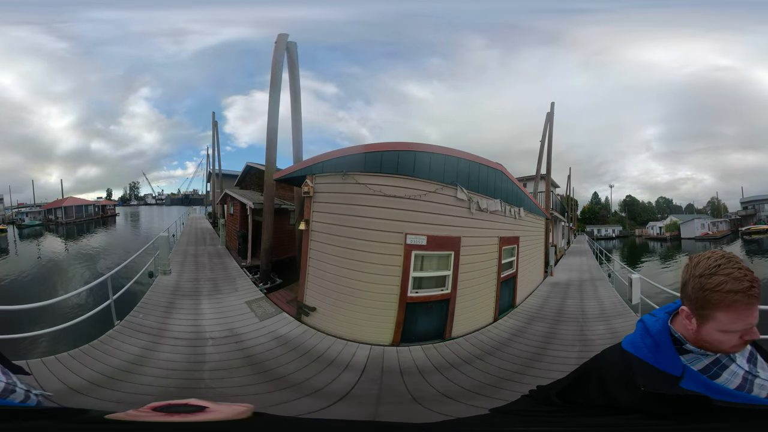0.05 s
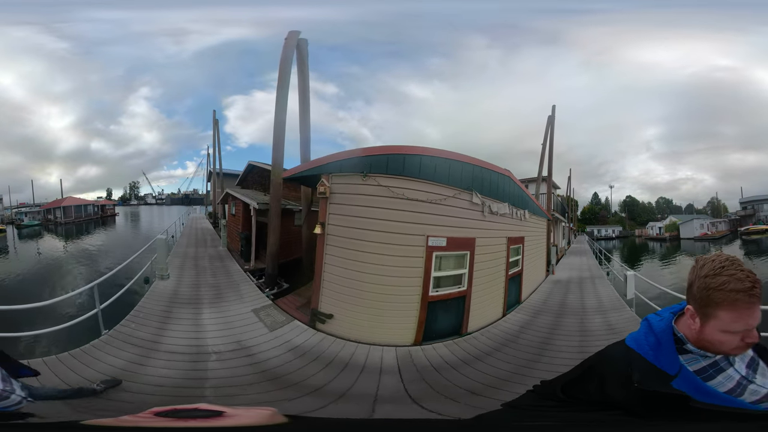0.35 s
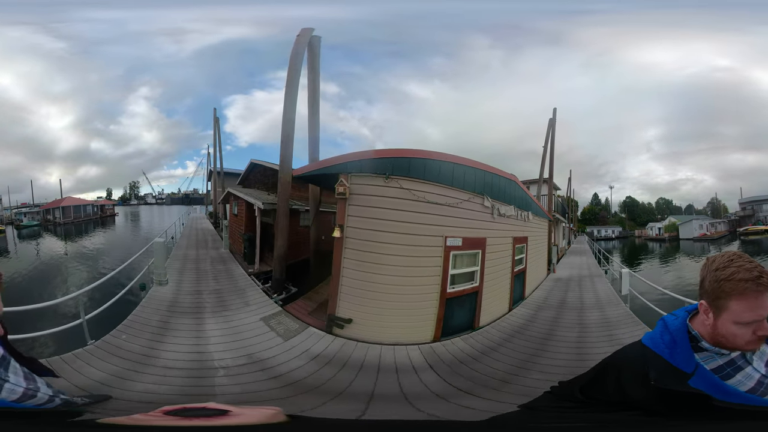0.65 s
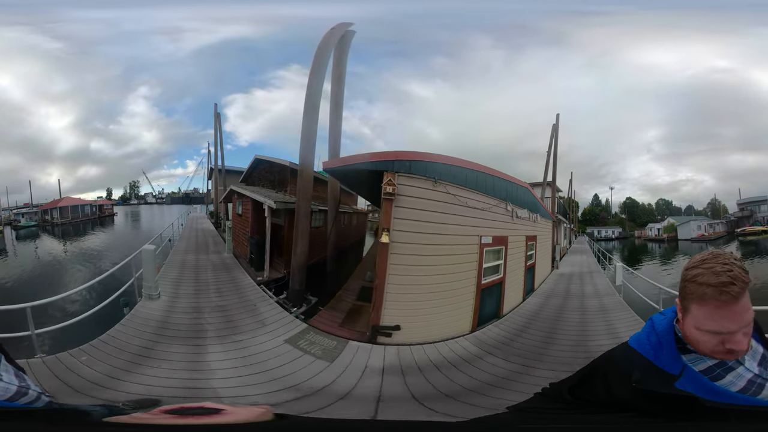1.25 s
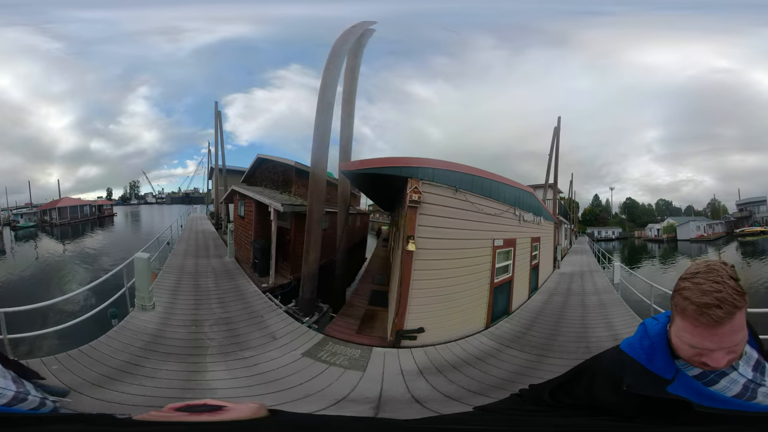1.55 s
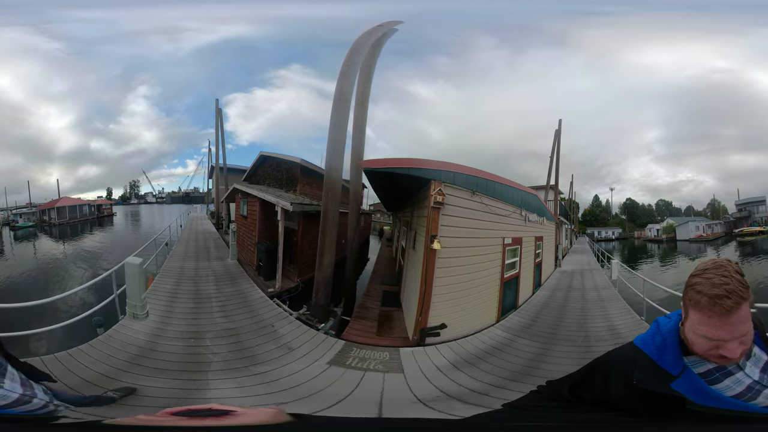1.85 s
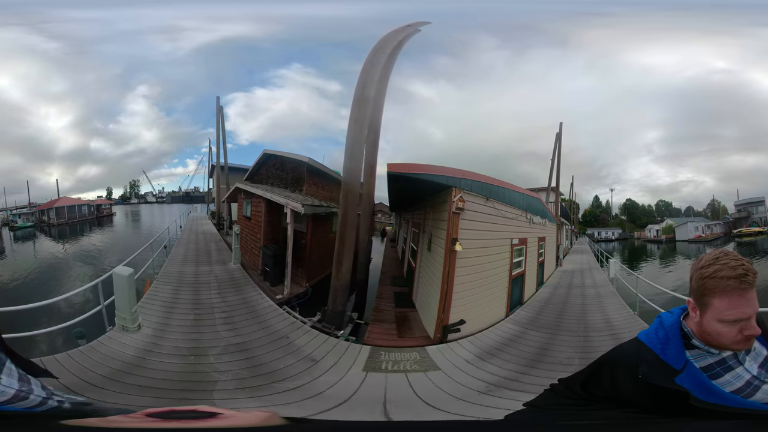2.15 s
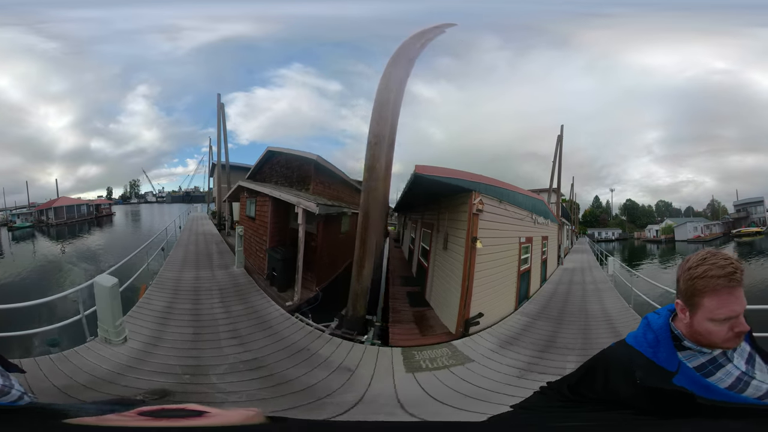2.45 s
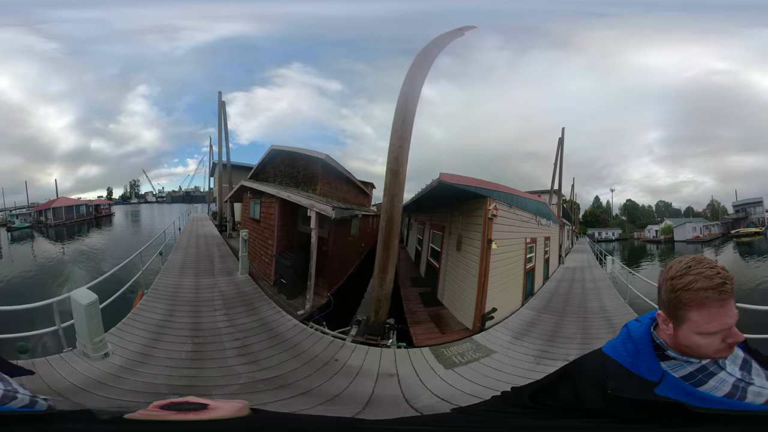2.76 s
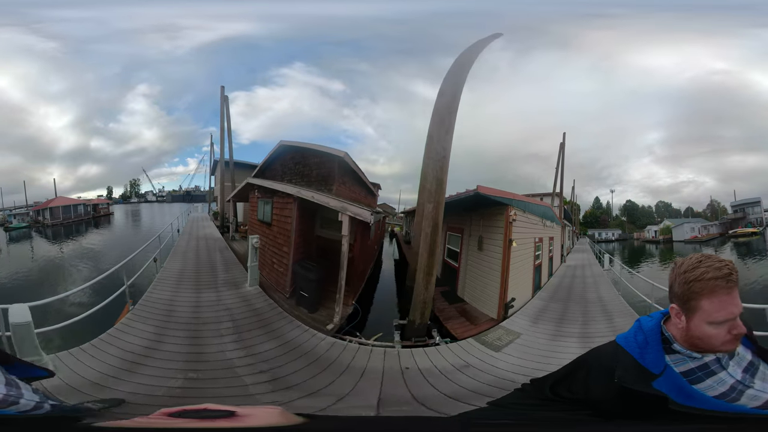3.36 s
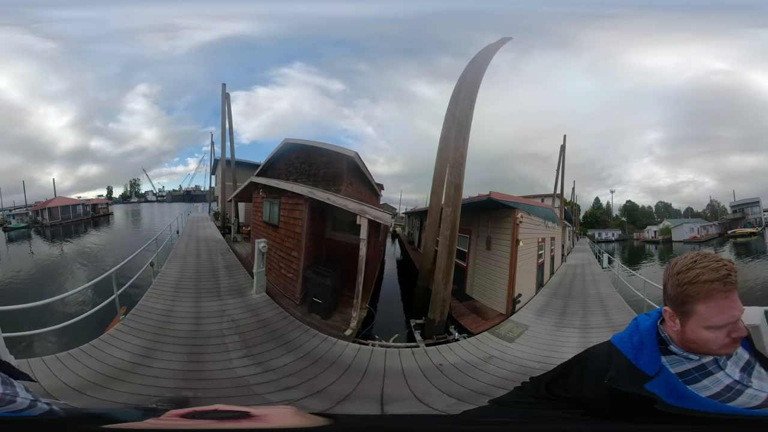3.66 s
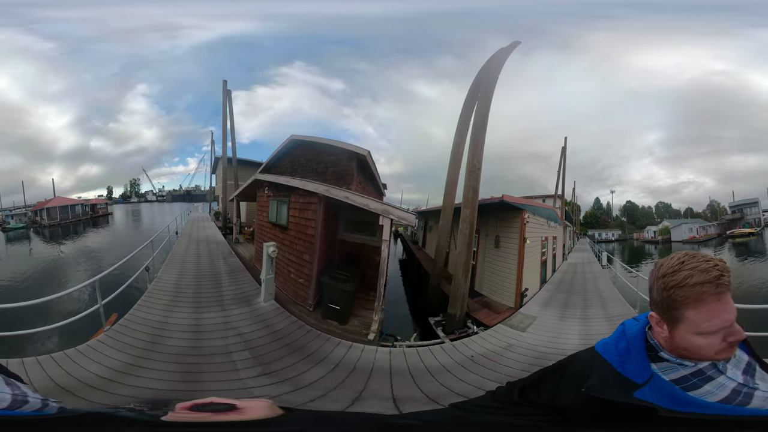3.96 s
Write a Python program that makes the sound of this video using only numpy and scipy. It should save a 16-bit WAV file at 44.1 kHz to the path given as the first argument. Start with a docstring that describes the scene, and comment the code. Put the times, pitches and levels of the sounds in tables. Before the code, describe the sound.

Distant traffic rumbles on a wooden dock between houseboats. Passing vehicles swell with low drones and tyre rasps, then a faint thin hiss appears. Light wind buffets the carried microphone, which bumps dully in the second half.

```python
"""Distant traffic rumbles, heard on a walk along a wooden dock between houseboats.
Passing vehicles swell out of the roar with low drones and tyre rasps. Faint high peeps come from
far off, and a thin, faintly whistling hiss opens up between the houses. The boards knock softly,
and the house walls echo all of this. Light wind buffets the microphone, which bumps dully as it is
carried. Very faint, tiny high clicks and crackle lie over the mix."""
import sys
import numpy as np
from scipy import signal
from scipy.fft import rfft, irfft
from scipy.io import wavfile
from scipy.ndimage import map_coordinates

SR = 44100
rng = np.random.default_rng(int(sys.argv[2]) if len(sys.argv) > 2 else 0)


def log_audio(samples):
    """Write samples as a 16-bit WAV file to the path given in sys.argv[1]."""
    # one column per channel
    frames = np.atleast_2d(samples).T
    # limit to full scale, then quantise
    limited = np.clip(frames, -1, 1)
    pcm = np.round(limited * 32767).astype(np.int16)
    wavfile.write(sys.argv[1], SR, pcm)


N = 176400
T = np.arange(N) / SR
HZ = np.fft.rfftfreq(N, 1 / SR)


def amp(db):
    """Decibels to gain."""
    return 10 ** (np.asarray(db) / 20)


def unit(x):
    """Scale to rms 1."""
    return x / np.sqrt(np.mean(x ** 2) + 1e-30)


def colour(points):
    """Gain per frequency from (freq_hz, gain_db) points."""
    freq_hz, gain_db = np.transpose(points)
    return amp(np.interp(np.log(HZ + 1), np.log(freq_hz), gain_db))


def level(points):
    """Gain per sample from (time_s, level_db) points."""
    return amp(np.interp(T, *np.transpose(points)))


def noise(spectrum):
    """Shaped noise of rms 1, rolled off below 14 Hz."""
    highpass = 1 - np.exp(-(HZ / 14) ** 4)
    phases = np.exp(2j * np.pi * rng.random(len(HZ)))
    return unit(irfft(spectrum * highpass * phases, N))


def noise_band(centre_hz, sigma_hz):
    """Gaussian band of noise, rms 1."""
    return noise(np.exp(-.5 * ((HZ - centre_hz) / sigma_hz) ** 2))


def drift(rate_hz):
    """Smooth random curve of rms 1, moving up to about rate_hz."""
    spectrum = np.exp(-(HZ / rate_hz) ** 2) * (HZ > 0)
    phases = np.exp(2j * np.pi * rng.random(len(HZ)))
    return unit(irfft(spectrum * phases, N))


def waver(depth_db, rate_hz):
    """Randomly drifting gain."""
    return amp(depth_db * drift(rate_hz))


def swell(peak_s, rise_s, fall_s):
    """Bell envelope with a separate sigma on each side."""
    return np.exp(-.5 * ((T - peak_s) / np.where(T < peak_s, rise_s, fall_s)) ** 2)


def swelling_bands(rows):
    """One swelling, fading noise band per row."""
    return sum(amp(level_db) * swell(peak_s, sigma_s, sigma_s) * noise_band(centre_hz, sigma_hz)
               for peak_s, sigma_s, centre_hz, sigma_hz, level_db in rows)


# City rumble: freq_hz, gain_db
RUMBLE_SPECTRUM = [(15, 0), (25, 5), (38, 1), (72, 2), (105, -2), (128, 1.5), (168, -0.5), (198, -8),
                   (238, -5.5), (295, -13), (420, -17), (650, -27.5), (1500, -47), (4000, -90.5)]
# City rumble: time_s, level_db
RUMBLE_ENVELOPE = [(0, -32.5), (.7, -33.5), (1.3, -32), (1.75, -33), (2.05, -32), (2.55, -33), (2.8, -34.5),
                   (3.2, -33.5), (3.62, -33.5), (4, -32.5)]
# Far tyres: freq_hz, gain_db
WASH_SPECTRUM = [(100, -1.5), (500, -0.5), (950, -2.5), (1300, -6.5), (1800, -15), (2200, -18.5),
                 (2520, -18), (3100, -24.5), (3650, -27), (4400, -33), (4850, -29.5), (5700, -31),
                 (6400, -39.5), (7300, -39), (8500, -54.5), (11000, -61), (15000, -59)]

def city(wash_db=-51.5, fade_db_per_s=0.6):
    """Steady low rumble and a wash of far tyres that the houses slowly screen."""
    rumble = level(RUMBLE_ENVELOPE) * noise(colour(RUMBLE_SPECTRUM)) * waver(depth_db=0.25, rate_hz=2.9)
    wash = amp(wash_db) * noise(colour(WASH_SPECTRUM)) * waver(depth_db=0.9, rate_hz=17)
    screening = amp(-fade_db_per_s * (T - T.mean()))
    return rumble + wash * screening


# Far peeps: peak_s, sigma_s, pitch_hz, level_db
FAR_PEEPS = [(0.452, 0.016, 5350, -70), (0.547, 0.0176, 4860, -82), (0.78, 0.021, 4780, -80),
             (1.294, 0.018, 6840, -81), (1.48, 0.03, 6900, -79), (1.536, .03, 7200, -82),
             (2.5, .03, 4220, -82.5), (2.52, .06, 6560, -79), (2.893, 0.022, 6930, -79),
             (3.67, 0.012, 5090, -82)]

def peeps(wander_hz=42, wander_rate_hz=90):
    """Short, clean whistles with a slightly trembling pitch."""
    out = np.zeros(N)
    for peak_s, sigma_s, pitch_hz, level_db in FAR_PEEPS:
        cycles = np.cumsum(pitch_hz + wander_hz * drift(wander_rate_hz)) / SR
        out += amp(level_db) * swell(peak_s, sigma_s, sigma_s) * unit(np.sin(2 * np.pi * cycles))
    return out


# Hiss: freq_hz, gain_db
HISS_SPECTRUM = [(1500, -4.5), (3300, -3), (4200, -3), (4550, -2.5), (5600, 1.5), (6000, 1), (6300, -2.5),
                 (6900, -1.5), (7500, -9), (8400, -23.5), (10000, -37.5), (14000, -57)]
# Hiss: time_s, level_db
HISS_ENVELOPE = [(0, -93.5), (1.2, -95), (1.45, -75.5), (1.585, -79), (1.6, -65), (1.75, -69),
                 (1.95, -70.5), (2.35, -74), (2.62, -70.5), (3.1, -74), (3.65, -72), (4, -81.5)]
# Whistling resonances: centre_hz, half_width_hz, gain_db
WHISTLE_RESONANCES = [(5940, 110, -7.5), (6700, 60, -8), (6920, 220, -10)]
# All whistles: time_s, gain_db
WHISTLE_ENVELOPE = [(0, -105), (1.2, -97.5), (1.5, -73.5), (1.9, -79), (2.15, -75), (2.34, -77),
                    (2.42, -72), (2.64, -72), (2.78, -77), (2.95, -73), (3.15, -76), (3.6, -73), (4, -80.5)]

def hiss():
    """Thin hiss like a small leak, with wavering whistles from narrow resonances."""
    air = level(HISS_ENVELOPE) * noise(colour(HISS_SPECTRUM)) * waver(depth_db=1.5, rate_hz=17)
    whistles = np.zeros(N)
    for centre_hz, half_width_hz, gain_db in WHISTLE_RESONANCES:
        resonance = 1 / (1 + ((HZ - centre_hz) / half_width_hz) ** 2)
        whistles += amp(gain_db) * noise(resonance) * waver(depth_db=1.8, rate_hz=12)
    return air + level(WHISTLE_ENVELOPE) * whistles


# Faint clicks: start_s, peak_db
FAINT_CLICKS = [(.121, -63), (0.286, -67), (.457, -64.5), (.5555, -65), (.6555, -61), (.855, -65),
                (1.555, -66), (1.79, -67), (1.89, -64.5), (2.39, -62), (2.523, -66), (2.657, -62),
                (3.062, -65.5), (3.32, -65), (3.827, -67), (3.955, -72)]

def clicks(decay_s=.00012, crackle_per_s=14, crackle_db=-73.5, spread_db=2.5):
    """Very faint, tiny high clicks, with fainter random crackle in between."""
    crackle_onsets = rng.random(N) < crackle_per_s / SR
    impulses = crackle_onsets * amp(crackle_db + spread_db * rng.standard_normal(N))
    for start_s, peak_db in FAINT_CLICKS:
        impulses[round(start_s * SR)] += amp(peak_db)
    envelope = signal.lfilter([1], [1, -np.exp(-1 / (decay_s * SR))], impulses)
    return envelope * rng.choice([-1, 1], N)


# Dock boards: start_s, gain_db, centre_hz
BOARD_KNOCKS = [(.177, -37, 750), (2.129, -45, 700), (3.234, -45, 650), (3.644, -47, 760)]

def knocks(rise_s=.0005, decay_s=.0034, sigma_hz=330):
    """Light knocks on the dock, each a short burst in one wide, woody resonance."""
    out = np.zeros(N)
    for start_s, gain_db, centre_hz in BOARD_KNOCKS:
        age_s = np.maximum(T - start_s, 0)
        envelope = (1 - np.exp(-age_s / rise_s)) * np.exp(-age_s / decay_s)
        out += amp(gain_db) * envelope * noise_band(centre_hz, sigma_hz)
    return out


# Wind buffet: freq_hz, gain_db
GUST_SPECTRUM = [(12, -2.5), (28, 3), (75, -1.5), (120, -10), (200, -12), (500, -43), (2000, -95)]
# Gusts: peak_s, sigma_s, level_db
WIND_GUSTS = [(0.26, .05, -36.5), (0.744, 0.048, -33.5), (2.34, 0.044, -34.5), (2.53, 0.065, -30.5),
              (3.101, 0.11, -33), (3.245, 0.047, -34), (3.811, 0.046, -28.5)]

def wind():
    """Short, low buffets of air on the microphone."""
    envelope = sum(amp(level_db) * swell(peak_s, sigma_s, sigma_s)
                   for peak_s, sigma_s, level_db in WIND_GUSTS)
    return envelope * noise(colour(GUST_SPECTRUM))


# Microphone bumps: peak_s, peak_db
MIC_BUMPS = [(2.332, -20), (3.149, -22.5), (3.234, -19.5), (3.474, -20), (3.95, -18.5)]

def bumps(pitch_hz=69, sigma_s=.0053):
    """Each bump of the carried microphone is one dull pressure pulse with no ring."""
    return -sum(amp(peak_db) * swell(peak_s, sigma_s, sigma_s) * np.cos(2 * np.pi * pitch_hz * (T - peak_s))
                for peak_s, peak_db in MIC_BUMPS)


# Tyre rasps: peak_s, sigma_s, centre_hz, sigma_hz, level_db
TYRE_RASPS = [(.305, 0.033, 780, 380, -48), (.32, 0.077, 3620, 500, -75.5), (0.65, 0.033, 950, 600, -49.5),
              (1.095, .018, 850, 278, -51), (1.458, 0.01, 2420, 259, -64.5), (1.72, 0.016, 2470, 220, -62),
              (1.735, .07, 2190, 940, -60.5)]

def rasps():
    """Tyres rasp in brief, wide bands of noise."""
    return swelling_bands(TYRE_RASPS)


# Heavy vehicles: peak_s, sigma_s, centre_hz, sigma_hz, level_db
HEAVY_DRONES = [(.32, 0.036, 130, 29.7, -36), (.55, 0.15, 248, 22.8, -42), (.55, 0.096, 349, 21.7, -47),
                (.655, 0.024, 137.4, 24.8, -31), (.76, 0.046, 483, 106.6, -44.5),
                (1.5, 0.067, 440, 27.7, -44), (1.625, 0.0067, 285, 50, -34),
                (1.75, 0.066, 338, 49.6, -42.5), (1.78, 0.095, 444, 73.4, -45), (2.42, 0.09, 131, 30, -35),
                (3.26, 0.041, 224, 55, -41.5), (3.81, 0.048, 139, 60, -34.5), (3.95, 0.043, 315, 70, -45.5)]

def drones():
    """Heavy vehicles drone in low, narrow bands of noise."""
    return swelling_bands(HEAVY_DRONES)


# Tyre roar of one vehicle: freq_hz, gain_db
ROAR_SPECTRUM = [(60, 0.5), (250, 15.5), (400, 2.5), (600, 3), (900, 1), (1300, -7.5), (1800, -14),
                 (2500, -20.5), (3500, -33.5), (4500, -36), (8000, -56), (14000, -75)]
# Passes: peak_s, rise_s, fall_s, level_db, tilt_db_per_octave
VEHICLE_PASSES = [(.31, 0.16, 0.29, -39, -1.5), (.645, 0.11, 0.2, -39.5, -2.5),
                  (1.12, 0.027, 0.035, -64, -2), (1.45, 0.047, 0.12, -49.5, 2.5),
                  (1.73, 0.11, 0.13, -38, -0.3), (2.3, 0.25, 0.34, -44, -1), (3.29, 0.15, 0.18, -39, -1.9)]

def vehicles(pivot_hz=900):
    """Each passing vehicle is a swell of tyre roar with its own brightness."""
    octaves = np.log2((HZ + 1) / pivot_hz).clip(-2, 3)
    out = np.zeros(N)
    for peak_s, rise_s, fall_s, level_db, tilt_db_per_octave in VEHICLE_PASSES:
        roar = noise(colour(ROAR_SPECTRUM) * amp(tilt_db_per_octave * octaves))
        out += amp(level_db) * swell(peak_s, rise_s, fall_s) * roar
    return out


def walls(direct, count=14, echo_db=-11.5, first_s=.004, last_s=.045, drift_s_per_s=.0006):
    """Add early echoes off the houseboats; the delays shift as the microphone moves."""
    reflected = irfft(rfft(direct) * HZ ** 2 / (HZ ** 2 + 250 ** 2), N)  # bass bends around the houses
    echoes = np.zeros(N)
    for place, shift, polarity in rng.uniform(-1, 1, (count, 3)):
        delay_s = first_s + (last_s - first_s) * abs(place) + drift_s_per_s * shift * T
        echo = map_coordinates(reflected, [(T - delay_s) * SR], order=3, mode="mirror")
        echoes += np.sign(polarity) * echo
    return direct + amp(echo_db) * echoes / np.sqrt(count)


def scene():
    """Mono mix: surroundings with wall echoes; wind, bumps and clicks without."""
    surroundings = city() + vehicles() + drones() + rasps() + hiss() + peeps() + knocks()
    return (walls(surroundings) + wind() + bumps() + clicks())[None]


def record(dry):
    """Low-pass at 15.8 kHz."""
    lowpass = signal.firwin(511, 15800, window=("kaiser", 9), fs=SR)
    return signal.oaconvolve(dry, lowpass[None], "same")


dry = scene()
out = record(dry)
log_audio(out)
```